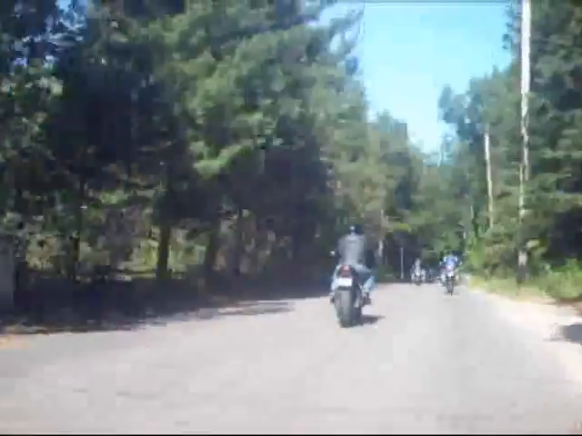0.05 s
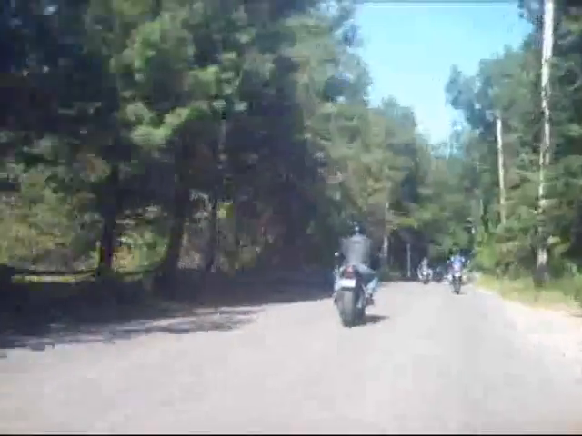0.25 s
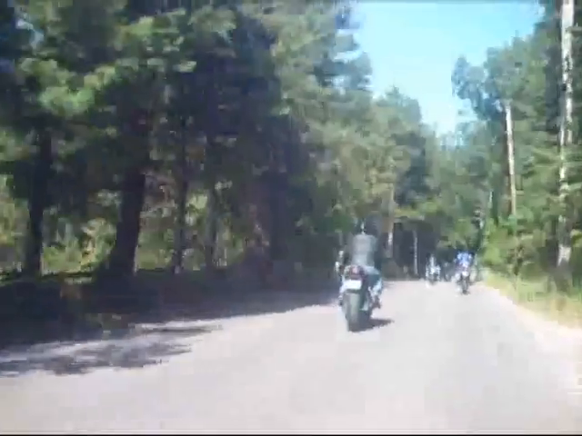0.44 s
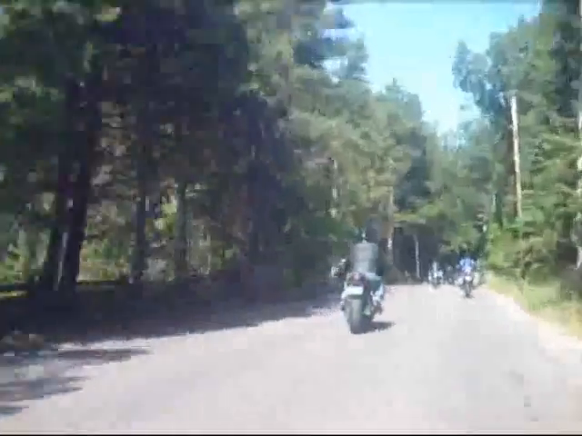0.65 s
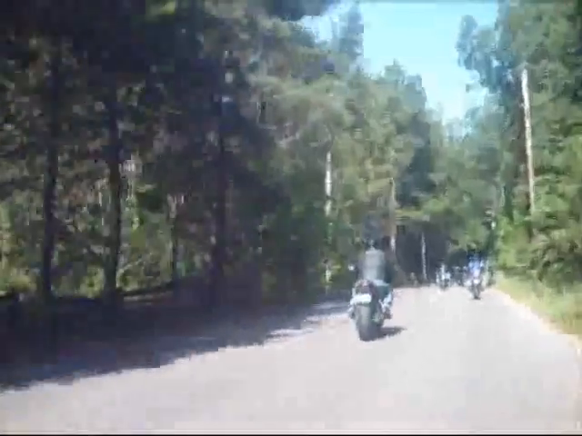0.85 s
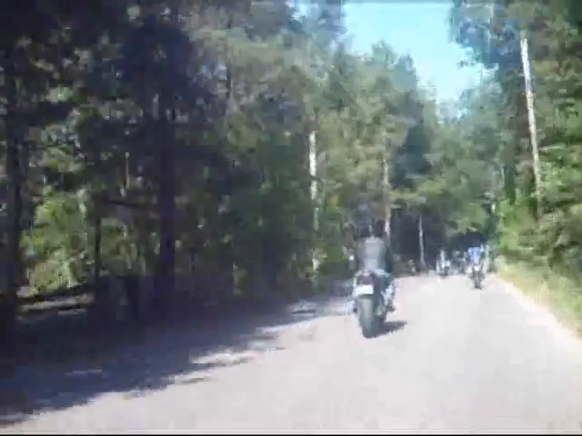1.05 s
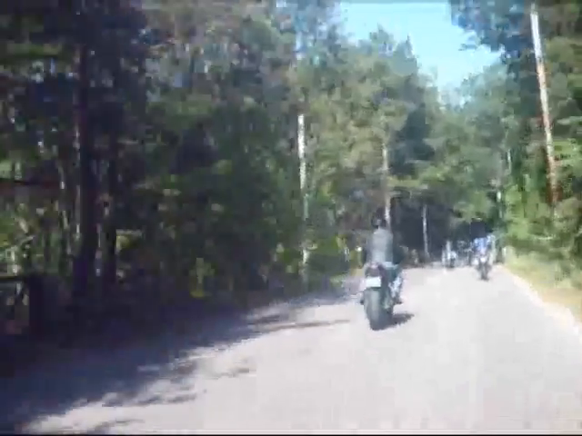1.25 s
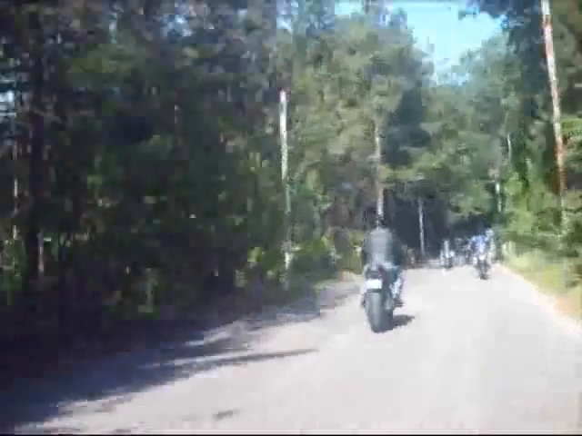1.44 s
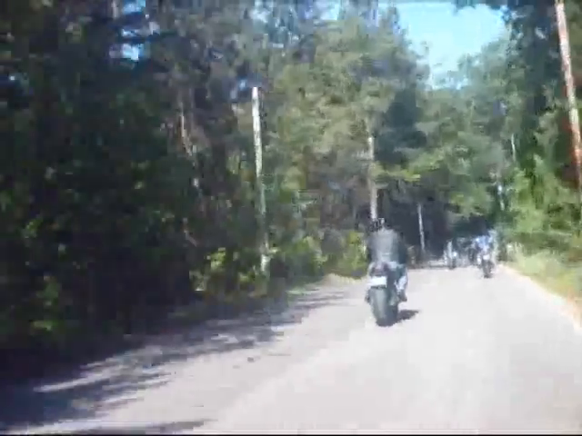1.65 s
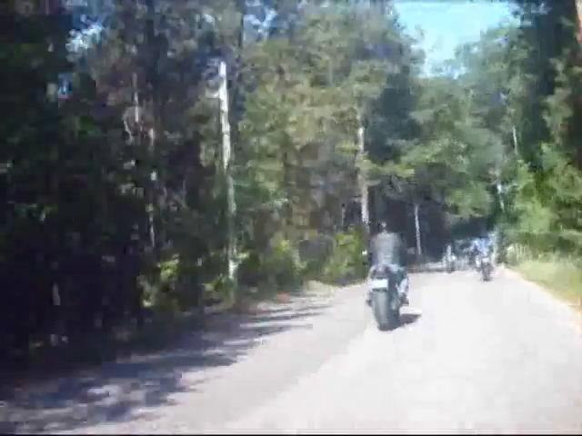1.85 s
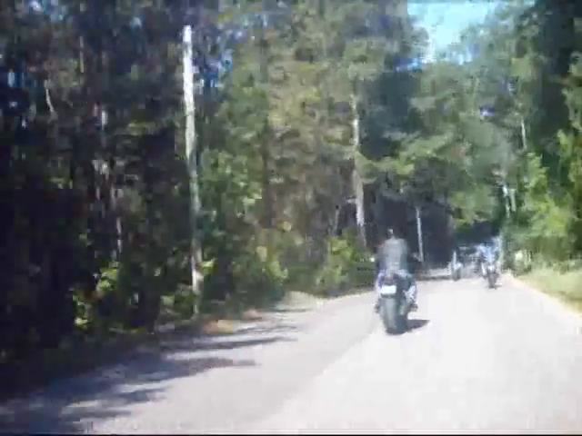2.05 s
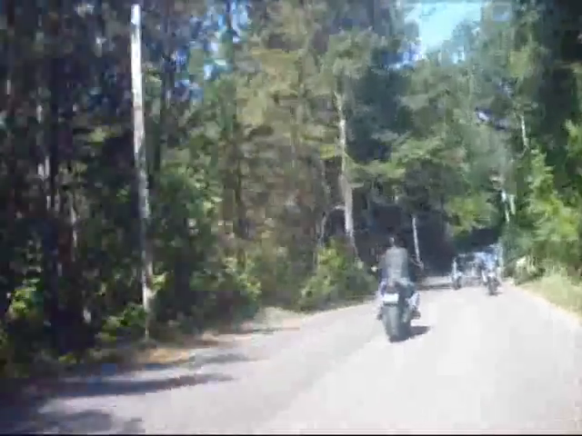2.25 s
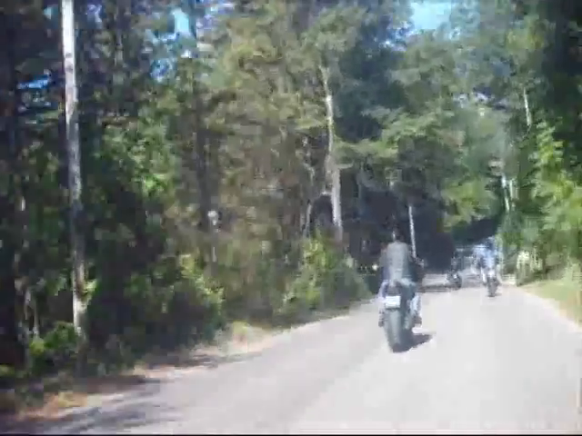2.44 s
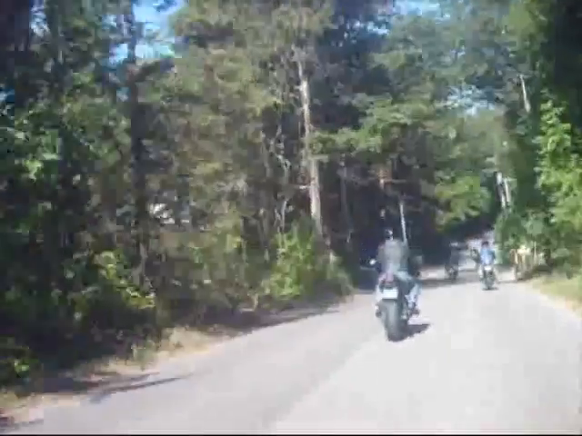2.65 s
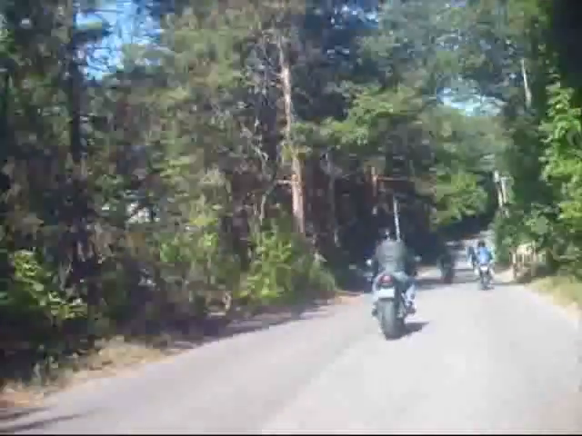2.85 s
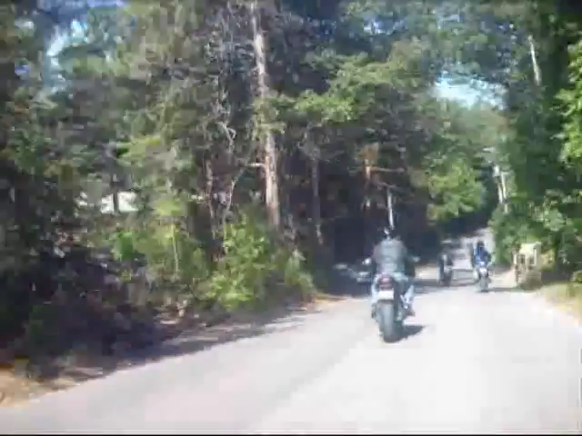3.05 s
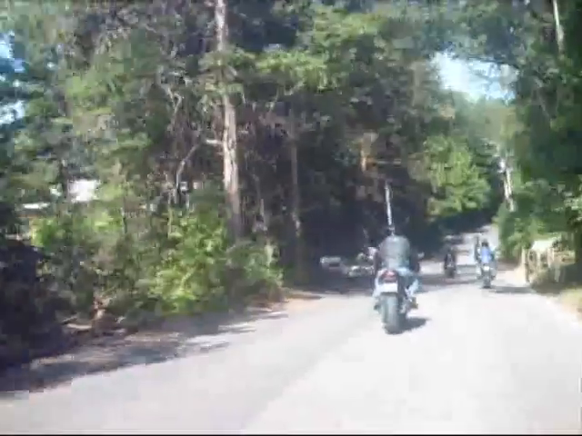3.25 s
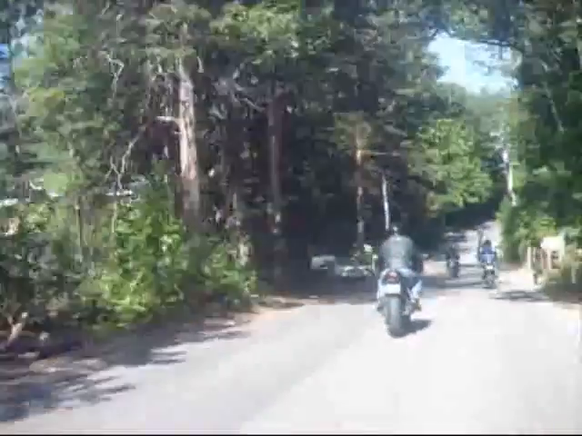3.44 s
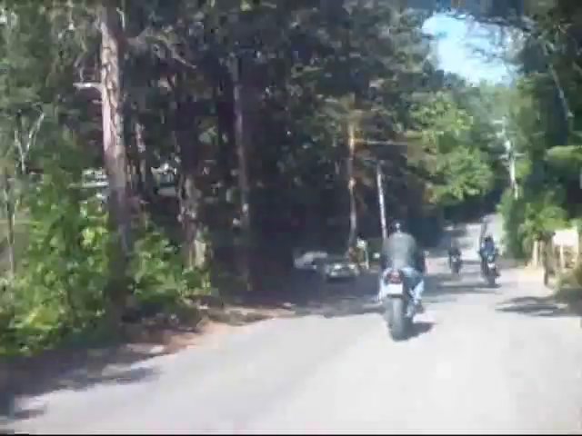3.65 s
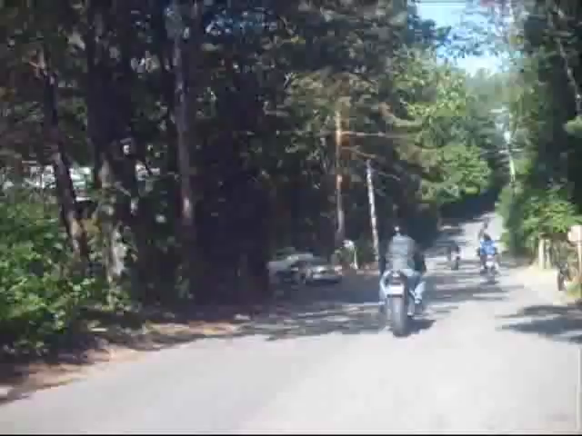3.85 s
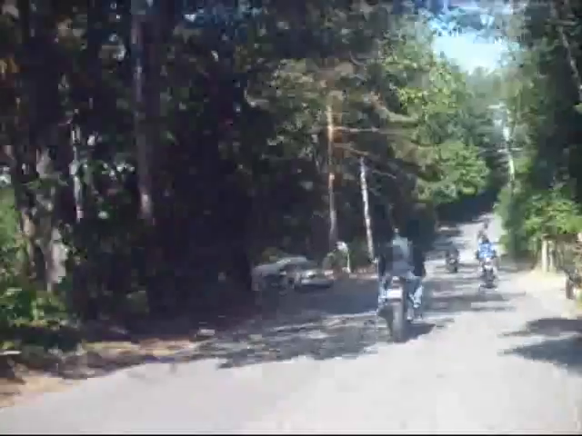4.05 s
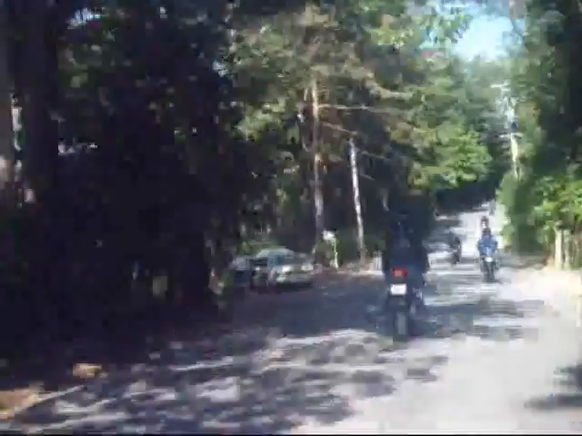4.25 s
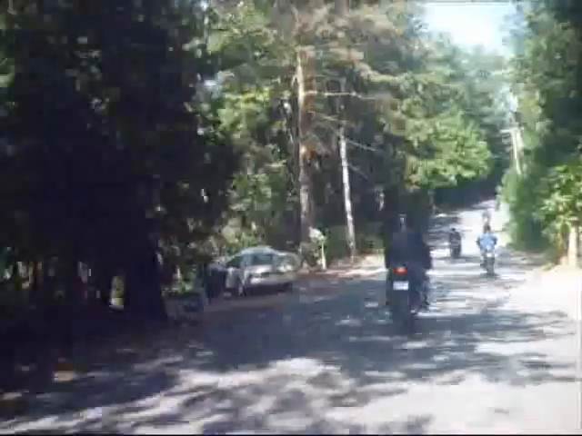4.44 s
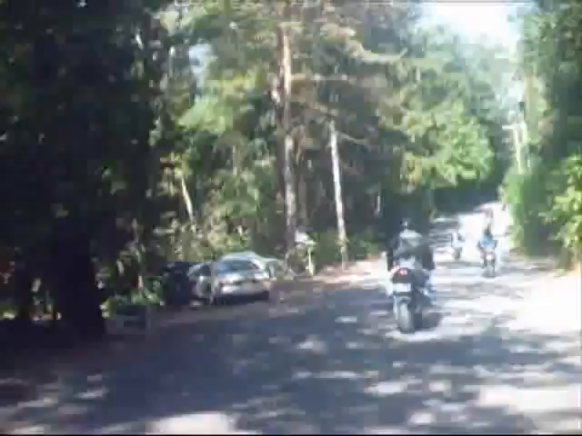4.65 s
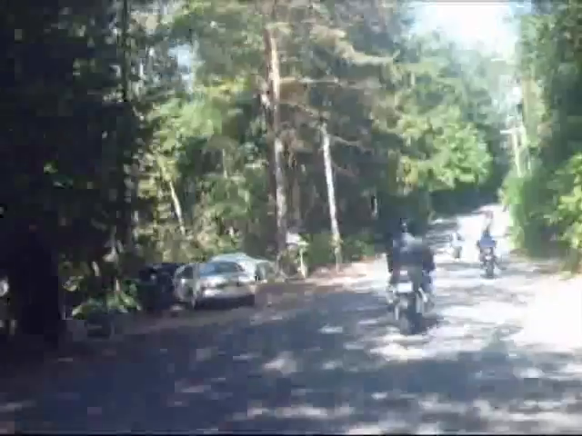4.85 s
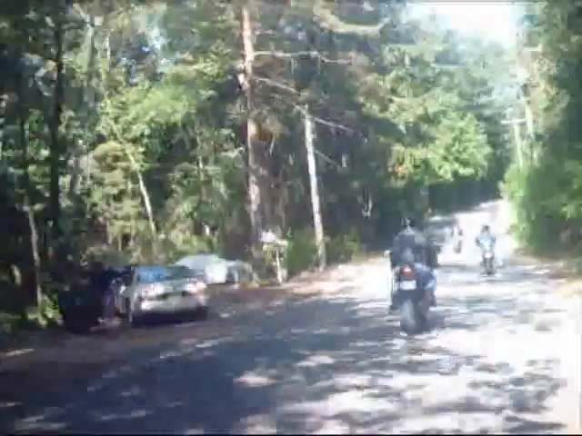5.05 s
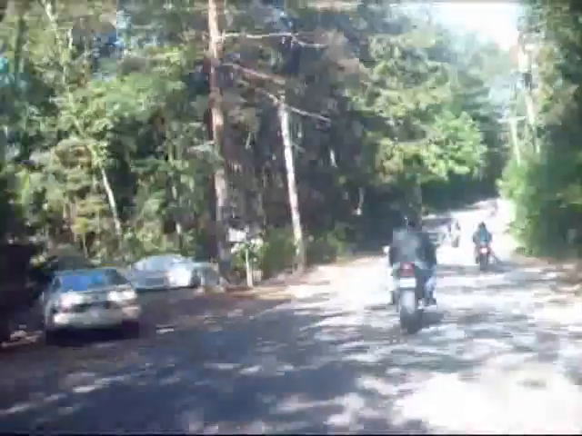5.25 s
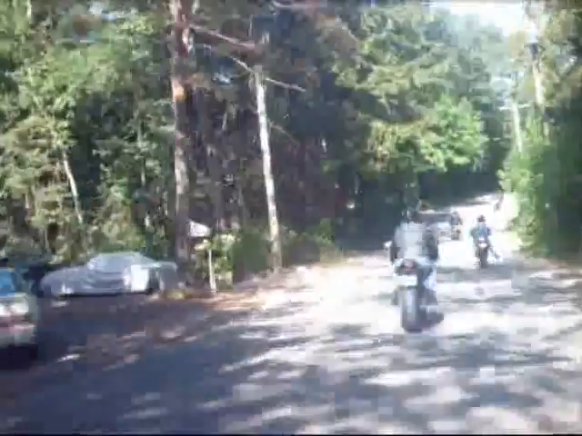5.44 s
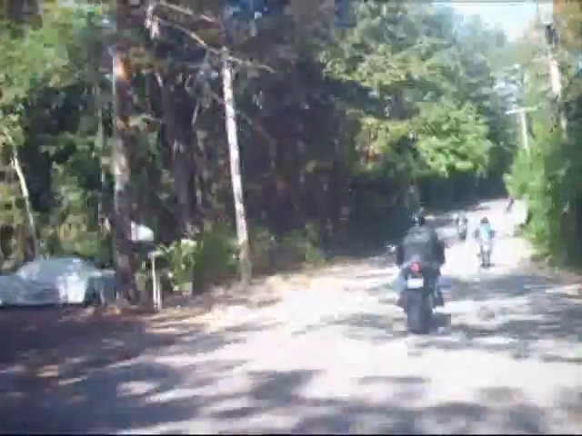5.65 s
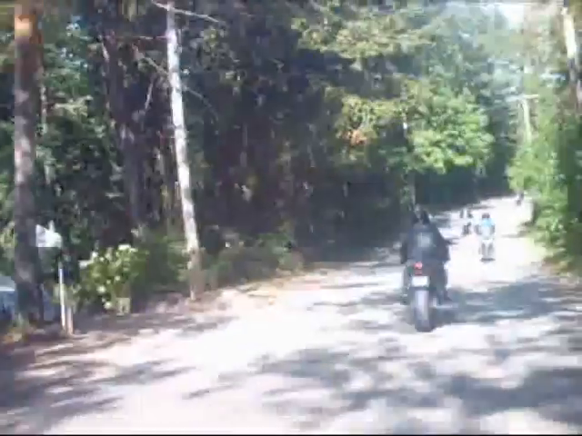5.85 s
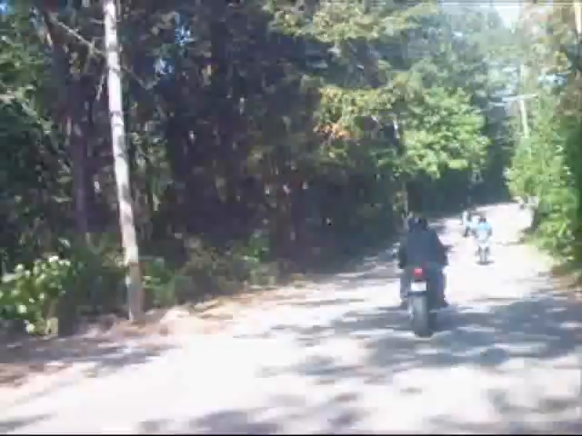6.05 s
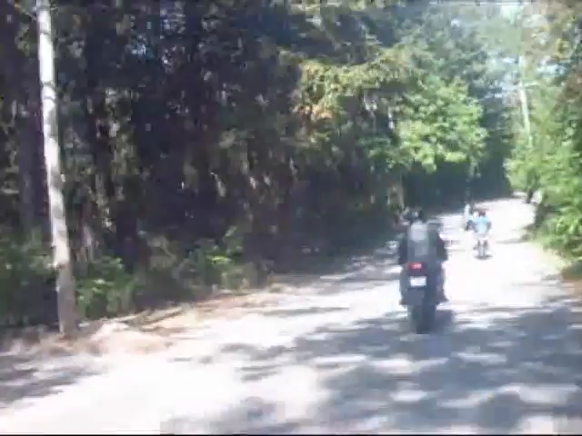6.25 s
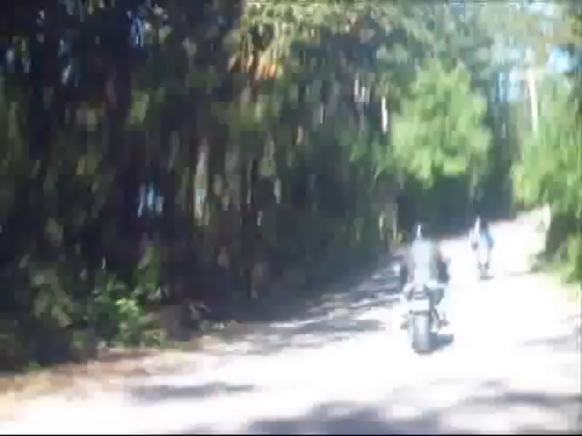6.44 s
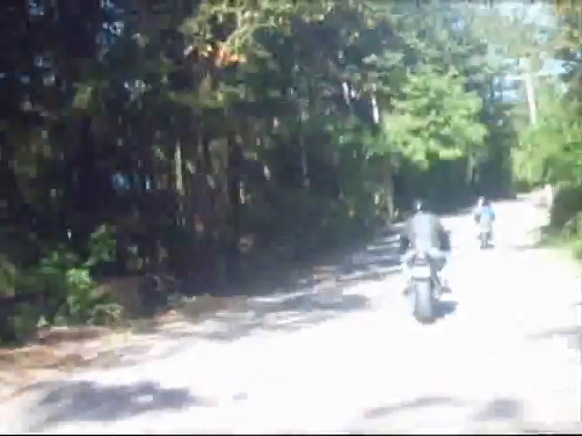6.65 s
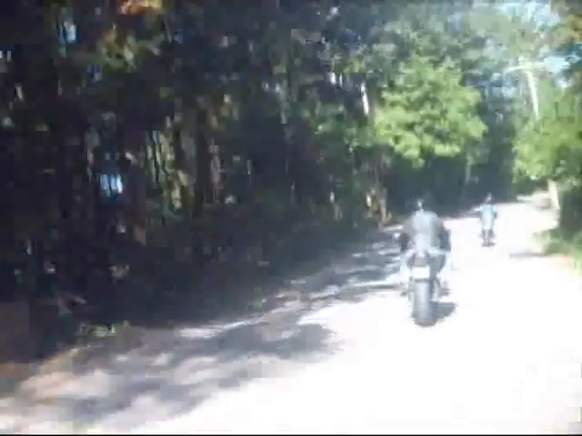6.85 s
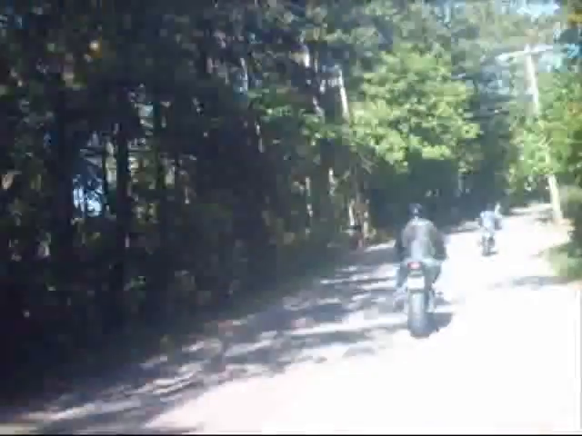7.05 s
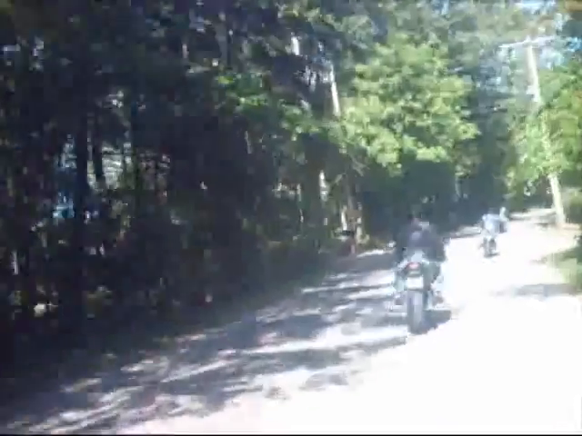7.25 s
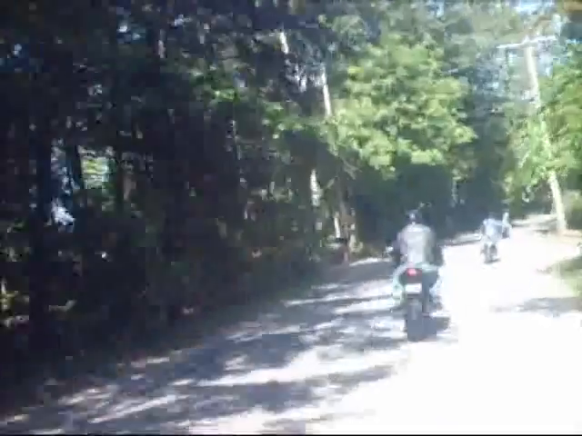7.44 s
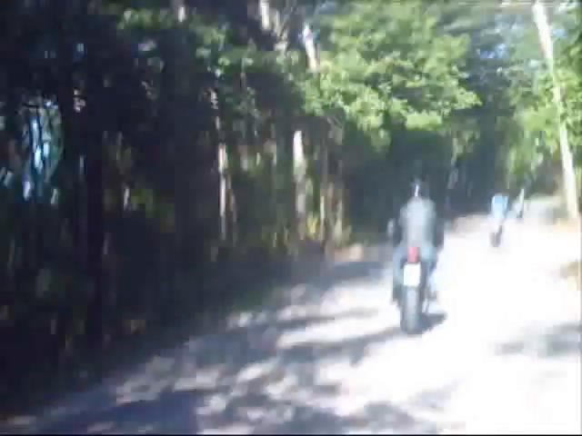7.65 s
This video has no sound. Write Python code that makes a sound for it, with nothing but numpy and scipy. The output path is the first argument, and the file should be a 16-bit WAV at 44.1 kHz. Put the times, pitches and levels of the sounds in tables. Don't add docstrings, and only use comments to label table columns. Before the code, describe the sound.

Steady low engine drone and road rumble from a moving motorcycle, rattling plastic knocks throughout, a sharp hard jolt near the end, gritty lo-fi sound.

```python
import sys
import numpy as np
from scipy import signal
from scipy.fft import rfft, irfft, next_fast_len
from scipy.io import wavfile
from scipy.ndimage import uniform_filter1d

SR = 44100
rng = np.random.default_rng(int(sys.argv[2]) if len(sys.argv) > 2 else 0)


def file_out(sig):
    cols = np.atleast_2d(sig).T
    lim = np.clip(cols, -1, 1)
    pcm = np.round(lim * 32767).astype(np.int16)
    wavfile.write(sys.argv[1], SR, pcm)


def amplitude_ratio(level_db):
    exponent = np.asarray(level_db, float) / 20
    return 10 ** exponent


N = 340011

# start_s, rumble_db, hiss_db
ROAD_AND_WIND = [(0.0, -50, -55), (0.4, -51.5, -59), (1.0, -50, -57.5), (1.55, -50, -57.5),
                 (2.3, -49.5, -58.5), (3.15, -52, -59), (3.55, -51.5, -57.5), (4.55, -50.5, -58.5),
                 (5.75, -50, -58.5), (6.05, -50.5, -60), (6.5, -49.5, -58), (7.1, -51.5, -60.5),
                 (7.4, -48, -59.5), (7.71, -47.5, -58.5)]
# pitch_hz, level_db (per Hz)
RUMBLE_TONE = [(90, -19), (110, -6.5), (200, -0.5), (300, 2.5), (480, -3.5), (650, -3), (800, -8),
               (1000, -14), (1500, -38.5)]
# pitch_hz, level_db (per Hz)
HISS_TONE = [(500, -34), (1200, 1.5), (1550, -5), (2000, -0.5), (2900, 2.5), (3300, 0), (3700, -2),
             (4100, -1)]
# pitch_hz, width_hz, level_db
BODY_MODES = [
    (680, 148, 6),
    (700, 267, -3),
]
# pitch_hz, width_hz, level_db
SHELL_MODES = [
    (1206, 250, -3.5),
    (1910, 520, -1.5),
]
# pitch_hz, width_hz, level_db
RING_MODES = [
    (3036, 367, 3),
]
# start_s, level_db (peak)
SHELL_CRACKS = [(0.025, -29.5), (0.0742, -25.5), (0.196, -36), (0.3613, -33.5), (7.583, -34), (0.9595, -32),
                (1.0192, -35), (1.1752, -34.5), (1.222, -25.5), (1.274, -35), (1.512, -31), (1.6648, -28.5),
                (1.735, -34), (1.748, -32), (2.0537, -28.5), (2.148, -32.5), (2.3241, -29), (2.5155, -31.5),
                (2.586, -30.5), (2.957, -36), (3.0395, -35.5), (3.1752, -33), (3.5348, -32.5),
                (3.9851, -32), (5.6482, -33), (5.6798, -32), (6.0006, -31.5), (7.644, -35.5),
                (7.5855, -23.5), (7.619, -32)]
# start_s, level_db (peak), brightness_db
RING_SNAPS = [(0.403, -36, -5), (0.7308, -38, 3), (0.7526, -35, -2), (0.786, -31.5, 9), (0.8908, -34, 16),
              (1.3432, -35, 2), (1.3811, -30.5, 0), (0.5067, -37, -7), (1.6438, -26.5, 2),
              (1.8227, -29.5, 12), (2.0328, -31.5, 2), (2.7468, -31.5, 4), (3.5627, -34, 4),
              (3.6144, -33.5, -8), (3.674, -33.5, 10), (4.3292, -36, -7), (4.352, -35, 0), (4.61, -37, -2),
              (4.763, -33.5, 6), (5.134, -35.5, 4), (5.4964, -39, -5), (5.7808, -30, 8.5),
              (5.8506, -36, -4), (6.5162, -26, -5), (6.6273, -39.5, 6), (6.752, -38, 7), (7.0705, -41, 0),
              (7.0952, -30.5, 8.5), (7.3439, -33.5, 8), (6.4687, -15.5, -6)]
# start_s, level_db (peak), pitch_hz
HOUSING_THUDS = [(0.025, -25.5, 720), (0.074, -25, 700), (0.362, -31, 530), (0.4, -35, 705),
                 (0.804, -28, 710), (0.852, -33, 630), (1.223, -24.5, 683), (1.384, -29.5, 670),
                 (1.666, -24.5, 687), (1.729, -33.5, 616), (1.815, -33.5, 597.6), (1.845, -31.5, 654),
                 (2.053, -28, 646), (2.152, -31, 604), (2.516, -29, 634), (2.557, -31, 589),
                 (2.586, -28.5, 733), (2.957, -30, 602), (3.175, -34, 628.4), (3.535, -34.5, 732),
                 (3.989, -33, 528), (4.622, -29, 522), (4.827, -34, 650), (6.469, -22, 707),
                 (6.516, -24.5, 736), (6.598, -31, 763), (7.371, -28.5, 606), (7.585, -24.5, 640),
                 (7.62, -27.5, 729), (7.645, -30, 520)]
# start_s, level_db (peak), pitch_hz
MORE_HOUSING_THUDS = [
    (1.24, -28, 680),
    (2.529, -30, 613),
]
# start_s (centre), level_db (swing), length_s
MOUNT_BUMPS = [(0.051, -28, 0.074), (0.231, -36.5, 0.035), (0.46, -36, 0.058), (0.821, -30.5, 0.077),
               (1.15, -38.5, 0.029), (1.268, -33, 0.038), (1.372, -34.5, 0.042), (1.505, -36.5, 0.053),
               (1.69, -33.5, .04), (1.86, -34.5, 0.029), (2.05, -33.5, 0.054), (2.201, -39, .04),
               (2.44, -33.5, .09), (2.588, -33, 0.044), (3.039, -40.5, .05), (3.2, -39.5, 0.036),
               (3.576, -36.5, 0.034), (3.73, -39.5, 0.038), (4.39, -33, 0.044), (4.693, -32.5, .05),
               (4.836, -40.5, .03), (5.12, -44, .06), (5.54, -38, 0.061), (5.82, -40.5, 0.084),
               (6.512, -26, .05), (6.61, -28.5, 0.048), (6.82, -32, 0.067), (7.109, -40.5, .04),
               (7.489, -41, .04), (7.62, -27, 0.053)]
# pitch_hz, level_db (per Hz)
FRAME_SHAKE_TONE = [(14, -12), (24, -5), (40, -1.5), (52, -10.5), (74, 2.5), (100, -11.5), (130, -3.5),
                    (260, -24.5)]
# start_s, pitch_hz (firing rate), level_db (first order, as throttle)
ENGINE_DRIFT = [(0.0, 141.7, -33.5), (0.3, 143.6, -42), (0.8, 142.4, -39), (1.1, 140.6, -40.5),
                (1.25, 140.8, -38.5), (2.5, 140.1, -38.5), (3.0, 141.3, -40), (4.35, 139.4, -40),
                (4.57, 139.2, -40.5), (4.72, 139.6, -39), (6.1, 139.2, -41), (6.26, 137.7, -45.5),
                (6.4, 138.6, -37), (6.95, 137.1, -38.5), (7.24, 135.8, -40), (7.33, 135.5, -48.5),
                (7.45, 134.8, -37.5), (7.71, 135.7, -42.5)]
ORDER_LEVELS = (-0.77, -10.5, -9.5)
# start_s, level_db (added to the threshold)
TREBLE_DROPOUT = [(0, .8), (.7, 0), (.9, 2.2), (1.6, 2), (1.8, 0), (5.7, 0), (6.1, 1.2), (6.5, 0),
                  (7.2, .8), (7.55, 2.4), (7.71, 0)]


def curves(table):
    s, *columns = np.transpose(table)
    return [np.interp(np.arange(N) / SR, s, column) for column in columns]


def unit(x):
    return x / np.sqrt(np.mean(x ** 2))


def resonate(x, modes):
    return sum(amplitude_ratio(db) * signal.lfilter(*signal.iirpeak(hz, hz / width, fs=SR), x) for hz, width, db in modes)


def walk(rate, size=32):
    levels = rng.standard_normal(int(N / SR * rate) + 2)
    place = np.arange(0, N, size) / SR * rate
    part = place % 1
    smooth_place = place - part + part ** 2 * (3 - 2 * part)
    coarse = np.interp(smooth_place, np.arange(len(levels)), levels)
    return uniform_filter1d(np.repeat(unit(coarse), size), size)[:N]


def turbulence(shape, ref_hz, common_db, own_db, rate):
    size = next_fast_len(N)
    hz = np.maximum(np.arange(size // 2 + 1) * SR / size, 1)
    at, db = np.transpose(shape)
    tone_db = np.interp(np.log(hz), np.log(at), db, left=-60, right=-60)
    full = rfft(rng.standard_normal(size)) * amplitude_ratio(tone_db)
    in_ref = (hz > ref_hz[0]) & (hz < ref_hz[1])
    full = full / np.sqrt(2 * np.sum(np.abs(full[in_ref]) ** 2)) * size
    out = 0
    gust = common_db * walk(rate)
    for centre in np.arange(np.floor(2 * np.log2(at[0])), 2 * np.log2(at[-1]) + 1) / 2:
        share = np.clip(1 - 2 * np.abs(np.log2(hz) - centre), 0, 1)
        out = out + irfft(full * share, size)[:N] * amplitude_ratio(gust + own_db * walk(rate / 2))
    return out


def road_rumble(rumble_db):
    return amplitude_ratio(rumble_db - 0.5) * turbulence(RUMBLE_TONE, (480, 1000), common_db=1.56, own_db=0.3, rate=30)


def wind_hiss(hiss_db):
    return amplitude_ratio(hiss_db + 1.5) * turbulence(HISS_TONE, (1600, 3500), common_db=1.11, own_db=0.5, rate=45)


def blows(times, db, lead_s=0.0018, tail_s=0.0031, chatter_db=-26):
    contacts = np.zeros(N)
    np.add.at(contacts, np.clip((times * SR).astype(int), 0, N - 1), amplitude_ratio(db))
    t = np.arange(-SR // 30, SR // 30 + 1) / SR
    swell = np.exp(np.where(t < 0, t / lead_s, -t / tail_s))
    grit = signal.fftconvolve(contacts, swell, "same") * rng.standard_normal(N)
    return contacts + amplitude_ratio(chatter_db) * grit


def rattle(hiss_db, count=900):
    draw = rng.random((count, 2))
    times = draw[:, 0] * (N - 1) / SR
    db = hiss_db[(times * SR).astype(int)] + 23.5 - 2.06 * np.log(draw[:, 1] * 0.68 + 0.065)
    ticks = blows(times, db, lead_s=0.0015, tail_s=0.0021, chatter_db=-18.0)
    return resonate(ticks, SHELL_MODES + RING_MODES) + amplitude_ratio(6.5) * resonate(ticks, BODY_MODES)


def knocks(late_s=0.000821, bounce_s=0.00055):
    crack_bright_db = -12.5
    cracks = [(s, db, crack_bright_db) for s, db in SHELL_CRACKS]
    s, db, bright_db = np.transpose(cracks + list(RING_SNAPS))
    shell = resonate(blows(s + late_s, db + 21.5), SHELL_MODES)
    ring = resonate(blows(s + late_s + bounce_s, db + bright_db / 2 + 23), RING_MODES)
    return signal.sosfilt(signal.butter(4, 3500, fs=SR, output="sos"), shell + ring)


def thuds(t60=0.015, rise_s=0.00096, push_s=0.00047):
    out = np.zeros(N + SR)
    t = np.arange(SR // 20) / SR
    fade = (1 - np.exp(-t / rise_s)) * np.exp(-np.log(1000) * t / t60)
    shove = -t / push_s * np.exp(1 - t / push_s)
    for s, db, hz in list(HOUSING_THUDS) + list(MORE_HOUSING_THUDS):
        ring = np.sin(2 * np.pi * hz * t) + 0.28 * np.sin(2 * np.pi * 1.86 * hz * t)
        out[int(s * SR):][:len(t)] += amplitude_ratio(db + 6) * (fade * ring + 0.38 * shove)
    return out[:N]


def mount():
    bump_trim_db, idle_swing_db = -2.5, -49
    rest_hz, soften_hz, knee_db = 30, 5, -42
    jolt_db, jolt_idle_db = -13, -50
    t = np.arange(N) / SR
    size = sum(amplitude_ratio(db + bump_trim_db) * np.exp(-((t - s) / length) ** 2) for s, db, length in MOUNT_BUMPS)
    hz = rest_hz - soften_hz * size / (size + amplitude_ratio(knee_db))
    phase = 2 * np.pi * np.cumsum(hz * (1 + 0.0768 * walk(15))) / SR
    swing = np.sqrt(2) * amplitude_ratio(1.9 * walk(18)) * (np.sin(phase) + 0.041 * np.cos(2 * phase))
    jolts = turbulence(FRAME_SHAKE_TONE, (45, 105), common_db=1.0, own_db=0.5, rate=12)
    swing_size = size + amplitude_ratio(idle_swing_db + 2.7 * walk(7.8))
    jolt_size = amplitude_ratio(jolt_db) * size + amplitude_ratio(jolt_idle_db)
    return swing_size * swing + jolt_size * jolts


def engine():
    follow, wander_db = 0.18, 1.2
    pipe_edge_hz, pipe_slope_hz, pipe_drop_db = 409.5, 0.6, -9
    turn_firings, throb_peak_s = 12, 3.777
    throb_2, throb_3, throb_sharp = 0.29, 0.49, 0.23
    throb_lag = 1.3
    hz, db = curves(ENGINE_DRIFT)
    upper = np.mean(db) + follow * (db - np.mean(db))
    pipe_db = pipe_drop_db / (1 + np.exp((3 * hz - pipe_edge_hz) / pipe_slope_hz))
    levels = [db + 1.45 * walk(6), upper + wander_db * walk(9), upper + pipe_db + wander_db * walk(14)]
    phase = 2 * np.pi * np.cumsum(hz * (1 + 0.0033 * walk(25))) / SR
    turn = (phase - phase[int(throb_peak_s * SR)]) / turn_firings
    throb = [1,
             1 + throb_2 * np.cos(turn - throb_lag),
             1 + throb_3 * np.cos(turn) + throb_sharp * np.cos(2 * turn)]
    hum = 0
    for k, level_db, trim_db, beat in zip((1, 2, 3), levels, ORDER_LEVELS, throb):
        tone = amplitude_ratio(0.55 * k * walk(45)) * np.sin(k * phase + 0.08 * k * walk(40))
        hum = hum + amplitude_ratio(level_db + trim_db) * beat * tone
    uneven = amplitude_ratio(levels[0] - 16.5 + 3.1 * walk(16)) * np.sin(phase / 2)
    return np.sqrt(2) * (hum + uneven)


def scene():
    rumble_db, hiss_db = curves(ROAD_AND_WIND)
    background = road_rumble(rumble_db) + wind_hiss(hiss_db)
    plastic = rattle(hiss_db) + knocks() + thuds()
    return (background + plastic + mount() + engine())[None]


def drop_faint_treble(x, from_hz=9000, under_db=-7):
    hz, s, bins = signal.stft(x, SR, nperseg=2048)
    hz = hz[:, None]
    near = uniform_filter1d(uniform_filter1d(np.abs(bins), size=5, axis=0), size=3, axis=1)
    typical = np.median(near[(hz[:, 0] > 10500) & (hz[:, 0] < 11500)])
    bar_db = under_db + np.interp(s, *np.transpose(TREBLE_DROPOUT)) + 1.5 * (hz > 11400)
    faint = (hz > from_hz) & (near < typical * amplitude_ratio(bar_db))
    return signal.istft(bins * np.where(faint, 0.03, 1), SR, nperseg=2048)[1][:N]


def sample_and_hold(x, sample_hz=8000, frame_hz=30, frame_slip=0.42):
    t = np.arange(N) / SR
    slip = frame_slip * np.floor(t * frame_hz) % 1
    held_s = (np.floor(t * sample_hz + slip) - slip) / sample_hz
    return np.interp(held_s, t, x)


def band_limit(x):
    return signal.sosfilt(signal.butter(12, 13240, fs=SR, output="sos"), x)


def record(dry):
    low = signal.sosfilt(signal.butter(8, 3500, fs=SR, output="sos"), dry)
    thinned = drop_faint_treble(sample_and_hold(low[0]))
    top_cut = signal.ellip(10, 0.2, 33, 12740, fs=SR, output="sos")
    mix = signal.sosfilt(top_cut, thinned)[None]
    return band_limit(mix)


dry = scene()
out = record(dry)
file_out(out)
```